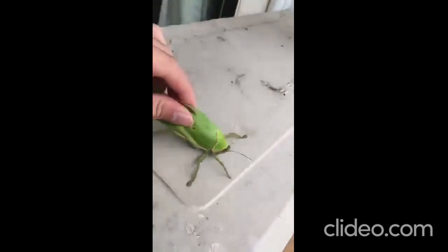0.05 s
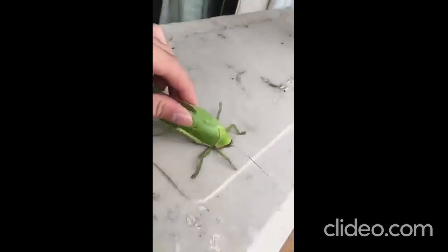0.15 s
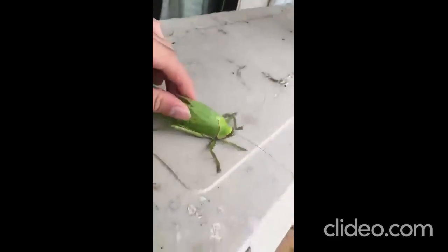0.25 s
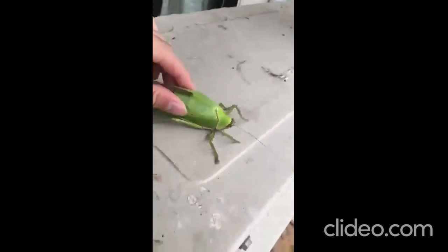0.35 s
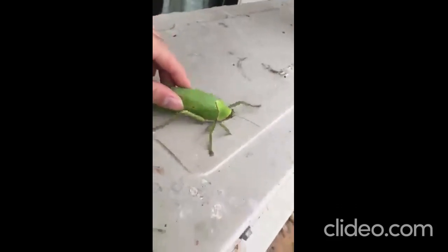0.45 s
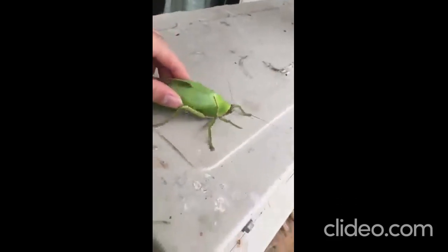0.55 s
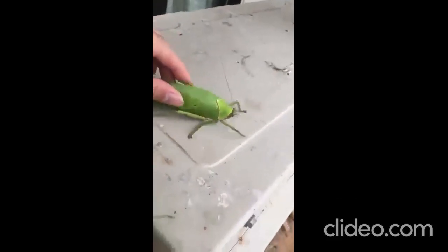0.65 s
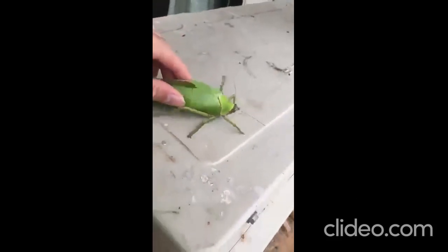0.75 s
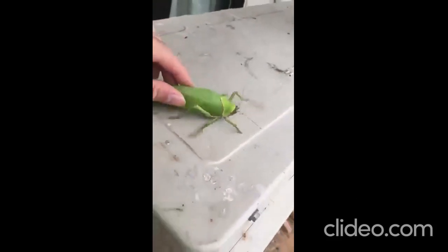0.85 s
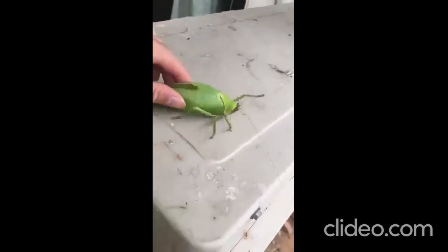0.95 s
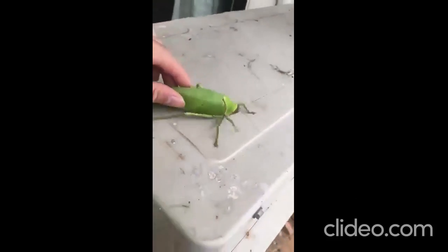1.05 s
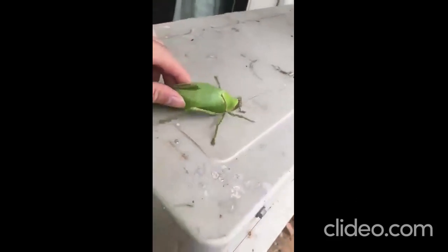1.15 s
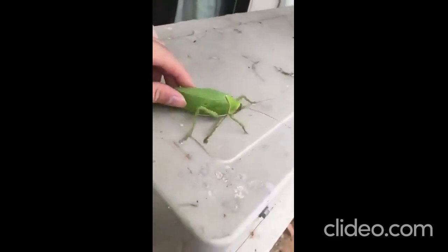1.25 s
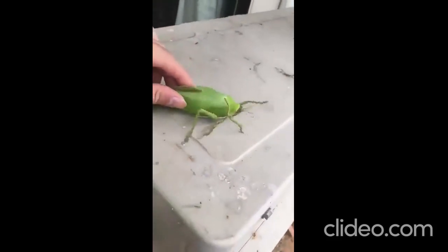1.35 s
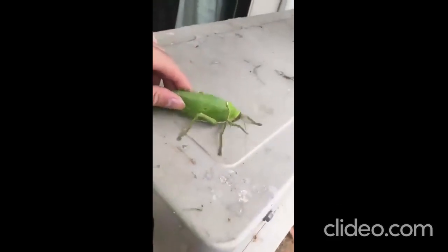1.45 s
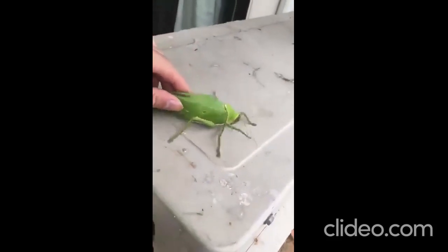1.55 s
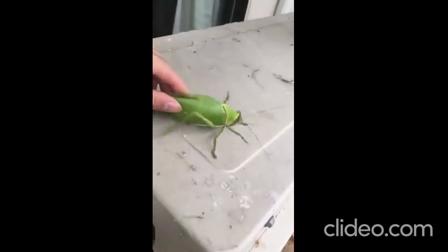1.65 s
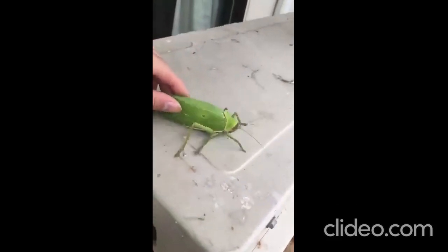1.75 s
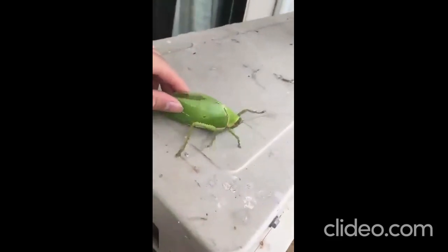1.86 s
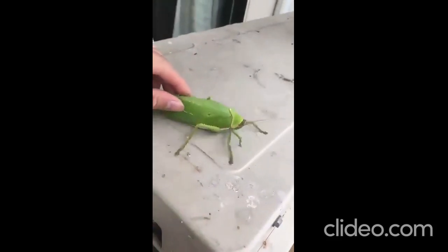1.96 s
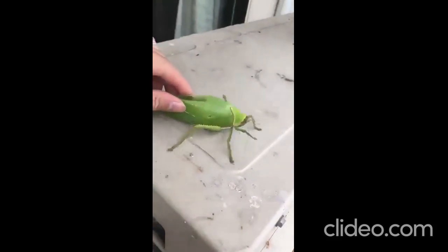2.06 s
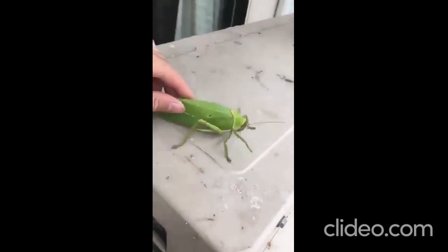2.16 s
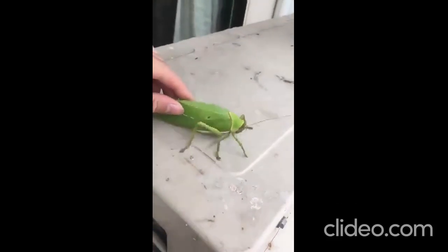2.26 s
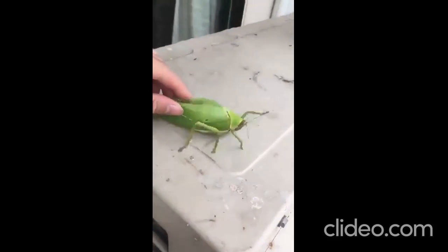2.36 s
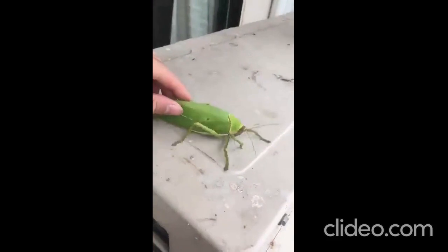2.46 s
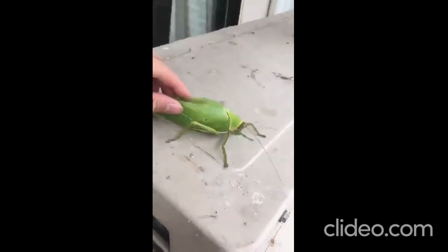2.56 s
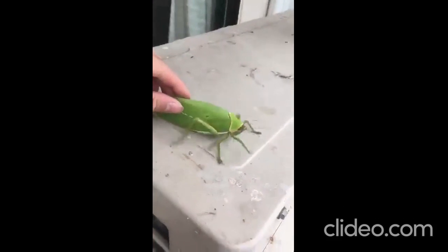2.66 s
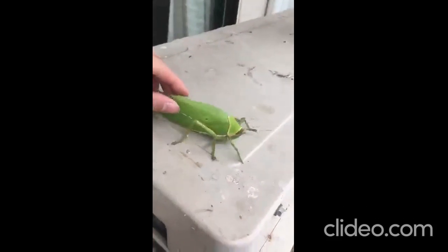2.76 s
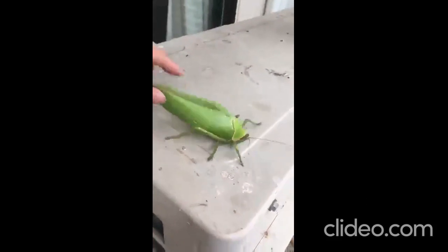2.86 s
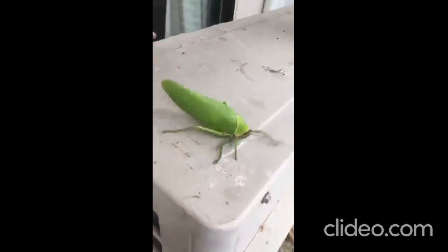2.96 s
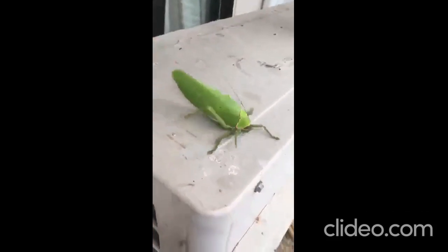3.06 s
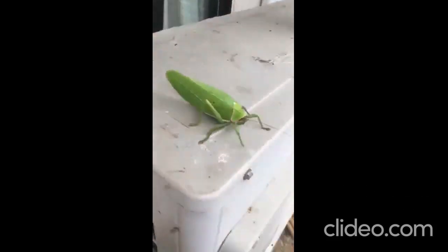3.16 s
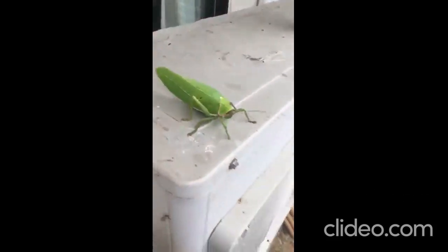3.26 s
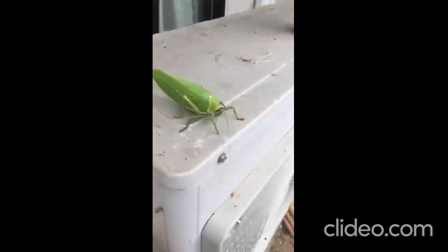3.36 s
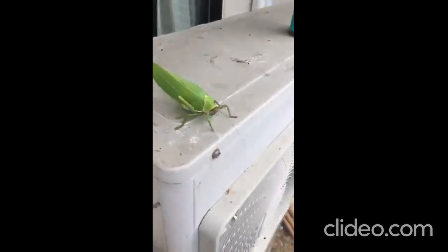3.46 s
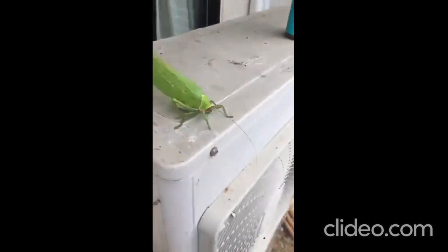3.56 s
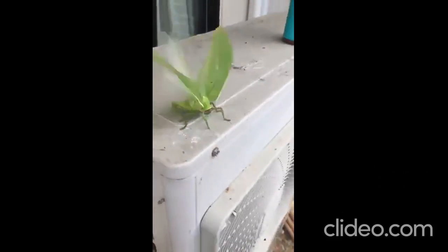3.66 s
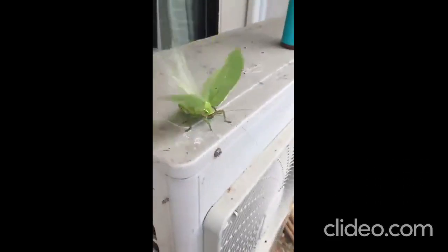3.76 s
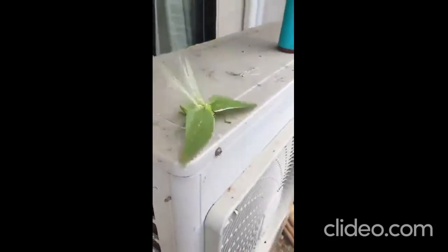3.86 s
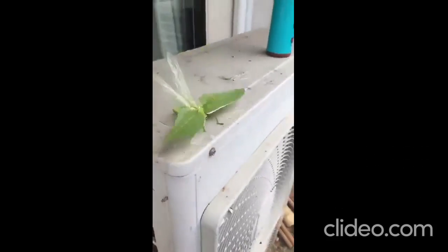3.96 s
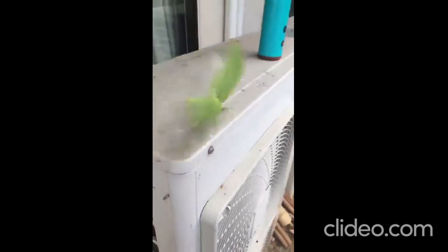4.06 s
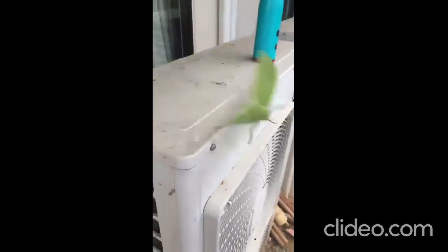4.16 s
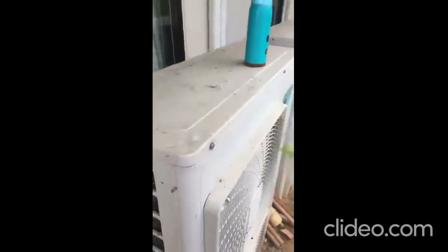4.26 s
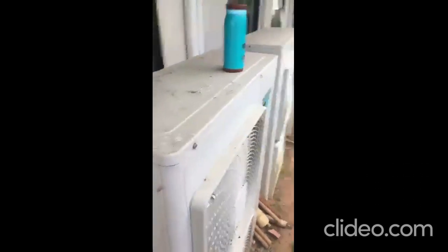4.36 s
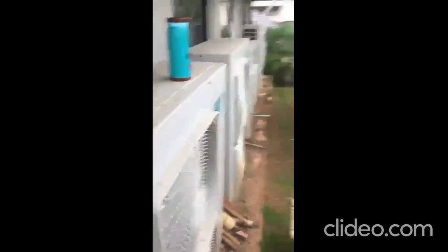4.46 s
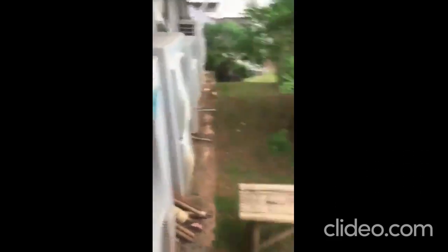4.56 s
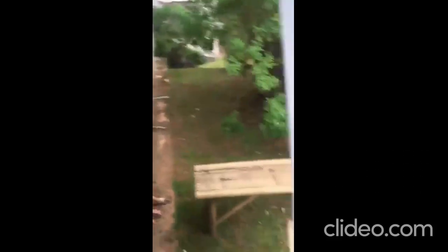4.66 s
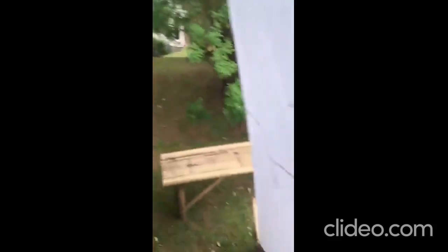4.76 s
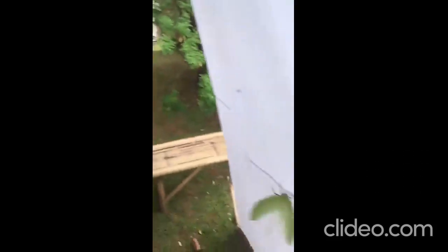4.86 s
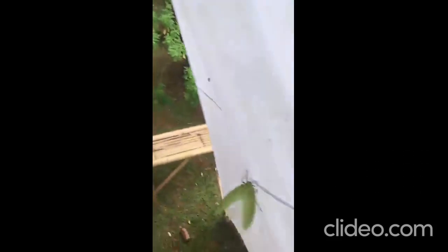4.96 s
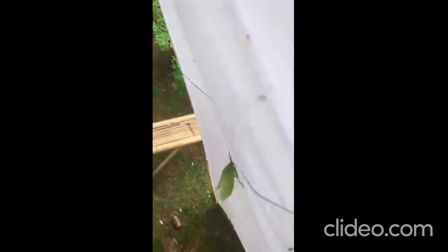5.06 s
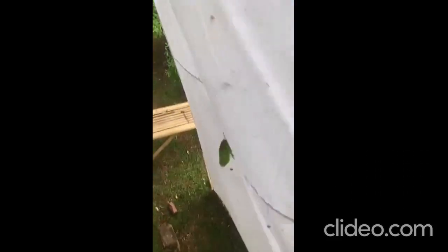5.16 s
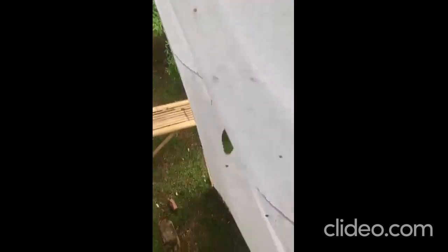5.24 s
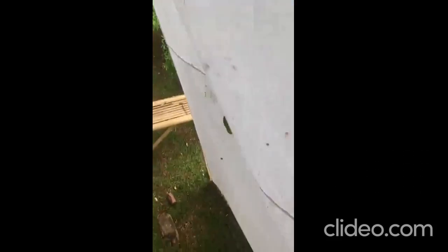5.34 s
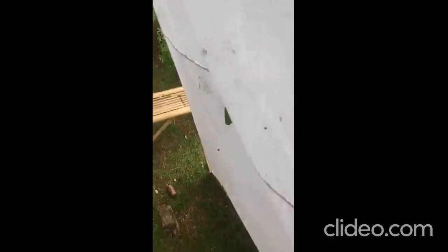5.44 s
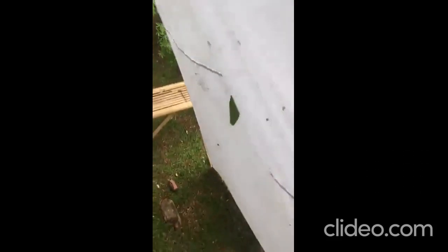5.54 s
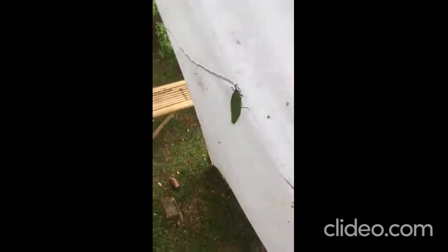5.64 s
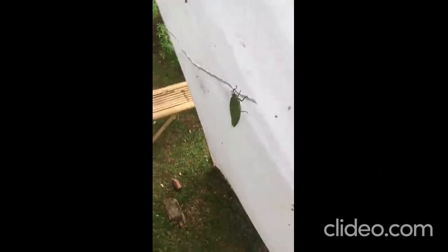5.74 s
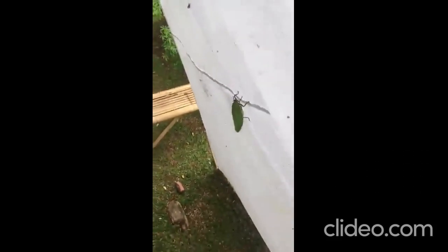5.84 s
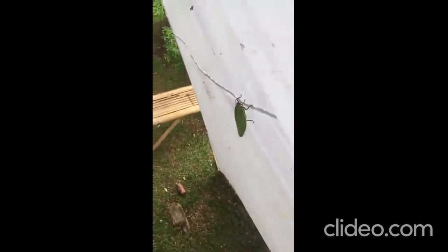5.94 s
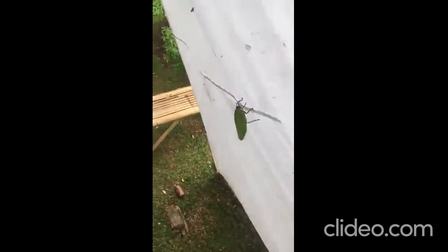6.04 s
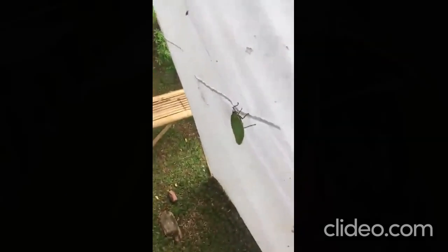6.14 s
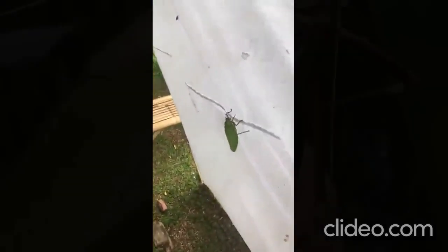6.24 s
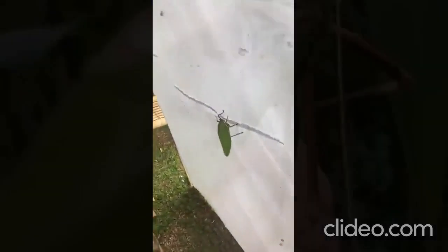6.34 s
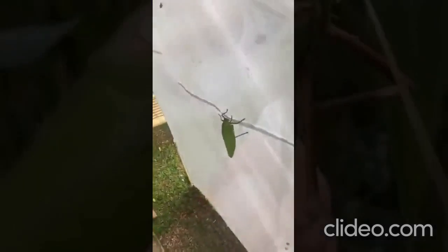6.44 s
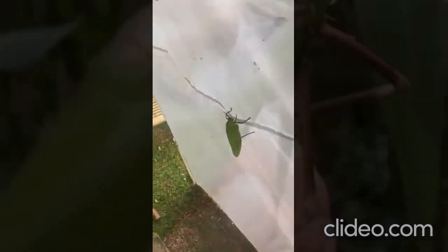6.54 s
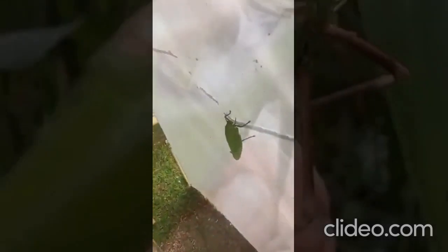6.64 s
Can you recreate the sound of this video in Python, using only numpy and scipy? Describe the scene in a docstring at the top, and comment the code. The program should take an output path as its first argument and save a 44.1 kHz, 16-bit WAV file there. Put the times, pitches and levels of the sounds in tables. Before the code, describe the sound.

Outdoors on a porch, close microphone, slight quick wall reflections. From about 0.2 s a large katydid rasps faintly as its wing opens, a quick toothy rattle, then at 0.33 s closes it with a loud, almost pure chirp near 2.3 kHz. Thirteen such chirps follow evenly, every 0.2 to 0.27 s until 3.1 s, each only 0.03 to 0.08 s long, some starting with a scratchy skid; the opening rasps soon become barely audible. Chirping stops. From 3.6 to 5.5 s come faint wing rustles, sharp little ticks near 4.4 and 4.7 s, and dull soft thuds, strongest at 4.75 s, while low rumble and airy hiss rise. Thin falling bird notes sound far away around 3.3, 4.3 to 4.7 and 5.9 to 6.4 s. From 6.05 s a harsher, raspy insect song stutters in triple bursts, ten a second, swelling to the end.

```python
"""A large katydid, held by the wings on a porch close to the microphone, protests: each wing opening rasps
faintly as a scraper rattles over a file of teeth, each closing gives a loud, almost pure chirp near 2.3 kHz,
one tooth per cycle. Let go, it flutters off and lands on a hanging sheet, with ticks and rustles of random grains.
At the end a harsher insect song of rough notes and rasp swells in triple bursts.
Small birds, thin falling tones, call far away over the garden's low rumble, air and hiss of coloured noise."""
import sys
import numpy as np
from scipy import signal
from scipy.fft import rfft, irfft, next_fast_len
from scipy.io import wavfile

SR = 44100
rng = np.random.default_rng(int(sys.argv[2]) if len(sys.argv) > 2 else 0)


def wrap_up_sound(samples):
    """Save the sound to the file named by the first command line argument, as 16-bit audio."""
    columns = np.atleast_2d(samples).T
    # keep every value between -1 and 1, then stretch to whole-number steps
    tamed = np.clip(columns, -1, 1)
    steps = np.round(tamed * 32767).astype(np.int16)
    wavfile.write(sys.argv[1], SR, steps)


N = 295470
TIME = np.arange(N) / SR


def from_db(db):
    """Decibels to gain."""
    return 10 ** (np.asarray(db) / 20)


def rms_one(x):
    """Scale to unit rms."""
    return x / np.sqrt(np.mean(x ** 2) + 1e-20)


def at_hz(points, hz):
    """Read a spectrum in dB on a log-frequency axis."""
    point_hz, db = np.transpose(points)
    return np.interp(np.log(hz + 1e-9), np.log(point_hz), db)


def colour(x, spectrum):
    """Causal (minimum-phase) filter with the given spectrum."""
    size = 2 * next_fast_len(len(x))
    gain = from_db(at_hz(spectrum, np.fft.rfftfreq(size, 1 / SR)))
    # folding the cepstrum forward in time gives minimum phase
    cepstrum = irfft(np.log(gain))
    cepstrum[1:size // 2] *= 2
    cepstrum[size // 2 + 1:] = 0
    return irfft(rfft(x, size) * np.exp(rfft(cepstrum)))[:len(x)]


def noise(spectrum):
    """Coloured noise, rms 1."""
    return rms_one(colour(rng.standard_normal(N), spectrum))


def grains(spectrum, per_s, spread_db):
    """Random clicks of uneven size and either sign, coloured by a spectrum, rms 1."""
    sizes = from_db(spread_db * rng.standard_normal(N).clip(-2, 2)) * rng.choice([-1, 1], N)
    struck = rng.random(N) < per_s / SR
    return rms_one(colour(sizes * struck, spectrum))


def wobble(t, rate):
    """Random values of spread 1, drawn rate times a second and joined by straight lines."""
    return np.interp((t - t[0]) * rate, np.arange(len(t)), rng.standard_normal(len(t)))


def span(start, stop):
    """Samples and times of an event, with a margin for its edges."""
    where = slice(int((start - .01) * SR), int((stop + .02) * SR))
    return where, TIME[where]


def gate(t, start, stop, rise, fall):
    """Opens after start and has closed by stop, with rounded edges."""
    opening = np.sin(np.pi / 2 * np.clip((t - start) / rise, 0, 1))
    closing = np.sin(np.pi / 2 * np.clip((stop - t) / fall, 0, 1))
    return opening * closing


def arc(u, first, middle, last):
    """Parabola through three values as u goes from 0 to 1, held outside."""
    return np.polyval(np.polyfit([0, .5, 1], [first, middle, last], 2), np.clip(u, 0, 1))


def in_time(rows):
    """The columns of a curve, sample by sample."""
    s, *columns = np.transpose(rows)
    return [np.interp(TIME, s, c) for c in columns]


def pressed(pressure, light, firm):
    """A value between those of a light and a firm stroke."""
    return light + pressure * (firm - light)


# Closing strokes. Each row: start in seconds, grip in seconds, stop in seconds, pitch in Hz,
# mid-stroke level in dB, rise from the grip to mid-stroke in dB, level just before the grip in dB, pressure 0-1.
CLOSING_STROKES = [(.333, .3345, .368, 2260, -4.3, 1.5, -10, 1), (.554, .555, .603, 2300, -3.5, 0, -10, .7),
                   (.752, .771, .821, 2400, -4, 6, -17, .05), (.939, .958, 1.015, 2345, -6, 5, -20, .05),
                   (1.162, 1.188, 1.226, 2380, -5, 3, -16, .4),
                   (1.38, 1.394, 1.427, 2295, -8, 11, -20, .75),
                   (1.592, 1.616, 1.635, 2230, -5.5, 6, -35, .85),
                   (1.809, 1.828, 1.877, 2435, -6.5, -2, -10, .55),
                   (2.053, 2.075, 2.126, 2375, -5.3, 0, -14, .1),
                   (2.288, 2.314, 2.336, 2230, -5.6, 5, -15, .8),
                   (2.543, 2.557, 2.59, 2170, -5.3, 9, -33, .8), (2.775, 2.789, 2.82, 2260, -4, 7, -16, .9),
                   (3.061, 3.073, 3.135, 2315, -5.2, 0, -12, .25)]
# Overtones of the chirp. Each row: frequency in Hz, relative level in dB.
OVERTONE_SPECTRUM = [(3500, 4), (4600, 1.5), (7000, -12), (8000, -15), (9300, -8.5), (11600, -5),
                     (14000, -5)]
# Scraper on the teeth. Each row: frequency in Hz, relative density in dB per Hz.
SCRAPE_SPECTRUM = [(300, -17.5), (1000, -4), (2000, 4.5), (3000, 4.5), (4200, 3.5), (6300, 0.5),
                   (7900, -17), (9500, -12.5), (13000, -2)]


def closings(slack=0.12, rattle=0.12, loose_jitter=.022, firm_jitter=0.0075, friction_db=-12, build_db=17):
    """The scraper skids, grips, then strikes one tooth per cycle of the wing's resonance: a near sine."""
    tone, overtones, scrape = np.zeros((3, N))
    edge = .004  # s
    for start, grip, stop, pitch, db, swell_db, lead, pressure in CLOSING_STROKES:
        where, t = span(start, stop)
        held = stop - edge - grip
        u = np.clip((t - grip) / held, 0, 1)
        loose = np.interp(t, [grip - edge, grip + edge], [1, 0])

        # the wing is still gathering speed before the grip; a firm stroke then speeds up (Hz per s)
        speed = np.interp(t, [min(start, grip - edge), grip], [1 - slack, 1])
        glide = pressed(pressure, 0, 7000) * held * (u - .5)
        # fast jitter and a slower wander, as shares of the pitch
        unsteady = (firm_jitter + loose_jitter * loose) * wobble(t, 600) + .009 * wobble(t, 90)
        hz = (pitch + glide) * speed * (1 + unsteady)
        phase = 2 * np.pi * np.cumsum(hz) / SR

        # a light stroke fades after the middle, a firm one holds its level
        grip_db = db - swell_db
        level = arc(u, grip_db, db, db - pressed(pressure, 6, -1.5))
        lead_in = np.interp(t, [min(start, grip - 2 * edge), grip - edge, grip],
                            [lead - grip_db - build_db, lead - grip_db, 0])
        contact = gate(t, start, stop, .0012 + (grip - start) / 5, edge)
        shake = 1 + rattle * loose * wobble(t, 1400) + .035 * wobble(t, 250) + .02 * wobble(t, 1100)
        tone[where] += from_db(level + lead_in) * contact * shake * np.sin(phase)

        # the tooth impacts add overtones, brighter when pressed firmly
        impacts = from_db(pressed(pressure, -48.5, -37.5) + lead_in / 4) * contact
        for k in np.arange(2, 7):
            overtone_db = at_hz(OVERTONE_SPECTRUM, k * hz) + 2 * wobble(t, 140)
            overtones[where] += impacts * from_db(overtone_db) * np.sin(k * phase)

        # a skidding scraper also squeaks above the note, rising and wavering by shares of 2960 Hz
        skidding = gate(t, start, grip + edge / 2, max(grip - start, edge / 2), edge) ** 2
        rising = np.interp(t, [start, grip], [-.5, .5])
        squeak_hz = 2960 * (1 + .15 * rising + .08 * wobble(t, 900))
        squeak_phase = 2 * np.pi * np.cumsum(squeak_hz) / SR
        squeak_db = pressed(pressure, -35.5, -27) + 3 * wobble(t, 500).clip(-2, 2)
        tone[where] += from_db(squeak_db) * skidding * np.sin(squeak_phase)

        # scraping noise: friction, skid, release tick and landing click
        friction = impacts * from_db(friction_db + lead_in / 4)
        friction = friction + from_db(pressed(pressure, -47, -41)) * skidding
        release = gate(t, stop - edge, stop, .0015, .002)
        friction = friction + from_db(pressed(pressure, -53, -34)) * release
        # the landing is hardest when the scraper grips at once: it loses 1001 dB per s of skid
        landing = gate(t, start, start + edge, .0006, .002)
        friction = friction + from_db(-27.5 - 1001 * max(grip - start, 0)) * landing
        # worn teeth catch unevenly
        scrape[where] += friction * from_db(3.5 * wobble(t, 450).clip(-2, 2))
    # so small a wing radiates little bass
    tone = signal.sosfilt(signal.butter(4, 1450, "high", fs=SR, output="sos"), tone)
    return tone + overtones + scrape * noise(SCRAPE_SPECTRUM)


# Opening strokes. Each row: start in seconds, stop in seconds, top speed in teeth per second before unevenness,
# level at top speed in dB, fade from there in dB.
OPENING_STROKES = [(0.225, .312, 2360, -24.5, 11), (.434, .532, 2370, -30, 16),
                   (0.651, .735, 2850, -36, 19), (0.86, .932, 3200, -45, 13),
                   (1.079, 1.152, 3000, -42.5, 15), (1.301, 1.365, 3430, -44, 8),
                   (1.519, 1.578, 3480, -43, 11), (1.736, 1.802, 3600, -43, 5),
                   (1.989, 2.045, 3950, -45, 9), (2.22, 2.278, 3780, -49.5, 3.5),
                   (2.469, 2.525, 4000, -43.5, 12.5), (2.706, 2.765, 4000, -43, 2),
                   (2.994, 3.045, 5230, -48.5, 6.5)]
# Body of the forewing. Each row: frequency in Hz, relative level in dB.
FOREWING_SPECTRUM = [(200, -36.5), (700, -19), (1200, -8), (2000, -1.5), (2900, 10), (3800, -5.5),
                     (5000, -13.5), (6300, -13.5), (7900, -27.5), (9500, -19.5), (12500, -14.5),
                     (14000, -17)]


def openings(begin_db=-5, finish_db=-5, uneven=.033, hiss_db=-16):
    """On the way back the scraper rattles lightly over the teeth, soon at top speed, then slowing."""
    start_share = .7  # of the top speed
    free_teeth_per_s, slowing_power = 6500, 1.3
    out, envelope = np.zeros((2, N))
    for start, stop, top, turn_db, fade_db in OPENING_STROKES:
        where, t = span(start, stop)
        # a louder opening drags more: it tops out and slows sooner, and strikes the teeth less evenly
        drag = min(from_db(turn_db + 20), .9)
        turn = start + .29 * (1 - drag) * (stop - start)
        jitter = .026 + .38 * drag ** 2

        # the nearer the top speed is to free running, the less it slows
        end_share = (top / free_teeth_per_s) ** slowing_power
        early = np.clip((turn - t) / (turn - start), 0, 1)
        late = np.clip((t - turn) / (stop - turn), 0, 1)
        slowing = (1 - end_share) * late ** (1.35 * (1 - drag))
        glide = top * (1 - (1 - start_share) * early ** 2 - slowing)
        rate = glide * (1 + uneven * (wobble(t, 500) + wobble(t, 110)))

        passed = np.cumsum(rate) / SR
        teeth = np.arange(1, int(passed[-1]))
        chance = rng.standard_normal((len(t), 2))[teeth]
        at = np.interp(teeth + jitter * chance[:, 0], passed, np.arange(len(t))).clip(0, len(t) - 2)
        # each strike falls between two samples
        clicks, whole = np.zeros(len(t)), at.astype(int)
        size = from_db(2 * chance[:, 1])
        np.add.at(clicks, whole, size * (1 - at + whole))
        np.add.at(clicks, whole + 1, size * (at - whole))

        late_db = turn_db - fade_db
        level = np.interp(t, [start, turn, stop - .011, stop],
                          [turn_db + begin_db, turn_db, late_db, late_db + finish_db])
        envelope[where] = from_db(level + 2.5 * wobble(t, 200)) * gate(t, start, stop, .003, .003)
        # subtracting the mean strike rate leaves no slow push
        out[where] += envelope[where] * rms_one(colour(clicks - rate / SR, FOREWING_SPECTRUM))
    return out + from_db(hiss_db) * envelope * noise(FOREWING_SPECTRUM)


# Wings and feet brushing things. Each row: centre in seconds, length in seconds,
# crackle level in dB, body level in dB.
WING_AND_FOOT_TOUCHES = [(3.616, 0.039, -57.5, -56.5), (3.801, 0.075, -58.5, -62.5),
                         (4.175, 0.025, -60, -71), (4.235, 0.0087, -52, -55), (4.423, 0.0029, -36, -61),
                         (4.725, 0.0052, -46.5, -44.5), (4.751, 0.03, -47, -46), (4.904, 0.057, -54.5, -55),
                         (4.918, 0.006, -48, -46.5), (5.25, .057, -55.5, -75), (5.364, 0.041, -57.5, -52.5),
                         (5.48, .069, -61.5, -62.5)]
# Bright crackle of a touch. Each row: frequency in Hz, relative level in dB.
CRACKLE_SPECTRUM = [(1000, -11), (3500, -2), (6000, 2.5), (9000, 1), (14000, 4.5)]
# Fuller body of a touch. Each row: frequency in Hz, relative level in dB.
BODY_SPECTRUM = [(100, 8), (400, -5.5), (1000, -3), (2000, -6), (4000, -7.5), (9000, -74)]


def brushes():
    """Wings and feet tick and rustle against a metal casing and the sheet: random grains in short swells."""
    crackle, body = np.zeros((2, N))
    for s, length, crackle_db, body_db in WING_AND_FOOT_TOUCHES:
        where, t = span(s - length, s + 2 * length)
        swell = np.exp(-2 * np.abs(t - s) / length) * np.sqrt(2)
        crackle[where] += from_db(crackle_db) * swell
        body[where] += from_db(body_db) * swell
    crackle = crackle * grains(CRACKLE_SPECTRUM, per_s=2900, spread_db=6.5)
    return crackle + body * grains(BODY_SPECTRUM, per_s=6100, spread_db=-1.0)


# Swell of the harsh song. Each row: time in seconds, relative level in dB.
SONG_SWELL = [(6.09, -62), (6.18, -45), (6.27, -40), (6.47, -35.5), (6.68, -31)]
# The three scrapes of a burst. Each row: delay in seconds, length in seconds, relative level in dB.
BURST_SCRAPES = [(.001, 0.015, -1), (0.018, 0.019, 0.5), (0.046, .024, 0)]
# Broad rasp of the scrapes. Each row: frequency in Hz, relative density in dB per Hz.
RASP_SPECTRUM = [(80, 0), (200, 3), (600, -2), (1500, 0), (2100, -7), (2900, 6), (3700, -8), (6000, -5.5),
                 (7300, -14), (8000, -21.5), (9500, -20.5), (11000, -17.5), (13200, -15.5)]


def harsh_song(note_hz=2920, note_db=-1.0, half_pitch_db=-9, bend=0.1187, rough=0.042,
               broad_db=-3, flutter_db=3, echo_db=-11):
    """Stuttering scrapes: rasp around a rough arching note; alternate harder teeth add half its pitch."""
    song_start, burst_period = 6.054, .098  # s
    envelope, notes = np.zeros((2, N))
    loudness, = in_time(SONG_SWELL)
    scrapes = [(s + delay, s + delay + length, db)
               for s in np.arange(song_start, TIME[-1], burst_period)
               for delay, length, db in BURST_SCRAPES if s + delay < TIME[-1]]
    # no two scrapes are quite alike: level spreads by 1.2 dB, pitch by a share of .03
    chances = rng.standard_normal((len(scrapes), 2))
    for (start, stop, db), (louder, higher) in zip(scrapes, chances):
        where, t = span(start, stop)
        level = loudness[where] + db + 1.2 * louder + flutter_db * wobble(t, 300)
        stroke = from_db(level) * gate(t, start - .002, stop + .002, .003, .005)
        arch = arc((t - start) / (stop - start), 1 - bend, 1, 1 - bend / 2)
        hz = note_hz * arch * (1 + .03 * higher + rough * wobble(t, 700) + .035 * wobble(t, 70))
        phase = 2 * np.pi * np.cumsum(hz) / SR
        envelope[where] += stroke
        notes[where] += stroke * (np.sin(phase) + from_db(half_pitch_db) * np.sin(phase / 2))
    rasp = grains(RASP_SPECTRUM, per_s=18000, spread_db=5.5)
    # the scrapes die away between bursts, with a time constant of 21 ms
    keep = np.exp(-1 / (0.021 * SR))
    tail = signal.lfilter([1 - keep], [1, -keep], envelope + 1e-18)
    song = from_db(note_db) * notes + from_db(broad_db) * envelope * rasp
    return song + from_db(echo_db) * tail * noise(RASP_SPECTRUM)


def porch(x, wall_db=-23, wall_t60=0.11, tail_db=-45, tail_t60=.75):
    """Quick reflections off the nearby wall, then a faint long tail: decaying noise as echoes."""
    t, response = TIME[:SR], 0
    for db, t60 in (wall_db, wall_t60), (tail_db, tail_t60):
        echoes = rng.standard_normal(SR) * (t > .002) * from_db(-60 * t / t60)
        response = response + from_db(db) * echoes / np.linalg.norm(echoes)
    return x + signal.fftconvolve(x, response)[:N]


# Soft low bumps. Each row: time of the fullest swell in seconds, level in dB.
SOFT_BUMPS = [(3.931, -41), (4.753, -31.5), (4.819, -43), (5.545, -42), (5.856, -39.5)]


def bumps(thud_hz=62, rise=0.0089):
    """Dull thuds: an unsteady low sine that swells and dies within a few cycles."""
    out = np.zeros(N)
    for s, db in SOFT_BUMPS:
        where, t = span(s - rise, s + .12)
        age = np.maximum(t - s + rise, 0) / rise
        phase = 2 * np.pi * np.cumsum(thud_hz * (1 + 0.27 * wobble(t, 154))) / SR
        out[where] += from_db(db) * age * np.exp(1 - age) * np.sin(phase)
    return out


# Phrases of far birds. Each row: start in seconds, stop in seconds, note spacing in seconds,
# first note's level in dB.
FAR_BIRD_PHRASES = [(3.33, 3.72, .16, -70), (4.25, 4.3, .1, -60), (4.45, 4.66, .06, -59),
                    (5.86, 6.37, .095, -64)]


def birds(pitch_hz=3900, fall=.18, length=.06, ragged=.055, variety=.07):
    """Thin, ragged notes from far away, each falling along an arc from a pitch of its own."""
    swell_db_per_s = 23  # a phrase grows louder note by note
    out = np.zeros(N)
    notes = [(s, db + swell_db_per_s * (s - start))
             for start, stop, spacing, db in FAR_BIRD_PHRASES
             for s in np.arange(start, stop, spacing)]
    chances = rng.uniform(-0.78, 1, (len(notes), 2))
    for (s, db), (height, stretch) in zip(notes, chances):
        where, t = span(s, s + 2 * length)
        stop = s + length * (1 + stretch / 4)
        falling = arc((t - s) / (stop - s), 1, 1 - fall / 4, 1 - fall)
        hz = pitch_hz * (1 + variety * height) * falling
        phase = 2 * np.pi * np.cumsum(hz * (1 + ragged * wobble(t, 900))) / SR
        out[where] += from_db(db) * gate(t, s, stop, 0.0098, 0.039) * np.sin(phase)
    return out


# Garden behind the porch. Each row: time in seconds, relative rumble level in dB,
# relative level of the murmuring air in dB.
GARDEN_LEVELS = [(.2, -53, -63), (.45, -59.5, -66.5), (.9, -66.5, -78.5), (2.2, -67, -70.5),
                 (3.25, -64, -73), (3.8, -55.5, -60.5), (4.5, -52.5, -62.5), (5.2, -53, -65.5),
                 (6.1, -55.5, -66)]
# Treble hiss. Each row: time in seconds, relative level in dB.
HISS_LEVELS = [(.22, -60), (.5, -75.5), (3.3, -75.5), (3.8, -71), (4.4, -61.5), (6.1, -69.5)]
# Low rumble. Each row: frequency in Hz, relative density in dB per Hz.
RUMBLE_SPECTRUM = [(13, -37.5), (22, -23), (43, 3), (59, -3.5), (71, 4.5), (97, -9), (159, -4.5),
                   (203, -12.5), (232, -18.5), (292, -22), (400, -23), (520, -54), (880, -120)]
# Murmur of the air. Each row: frequency in Hz, relative density in dB per Hz.
MURMUR_SPECTRUM = [(150, -27), (250, 3), (474, -6), (586, -1), (944, -1.5), (1100, 1), (2360, -10),
                   (3990, -16), (5000, -25.5), (6500, -49), (11000, -120)]
# Hiss of the air. Each row: frequency in Hz, relative density in dB per Hz.
HISS_SPECTRUM = [(2000, -8), (3500, 0), (5500, -2), (8000, -5.5), (14000, -1.5)]


def garden(low_db=2.0, middle_db=1.5, high_db=.5):
    """Outdoor rumble, air and hiss as three coloured noises, fainter while the insect chirps."""
    rumble, air = in_time(GARDEN_LEVELS)
    hiss, = in_time(HISS_LEVELS)
    low = from_db(low_db + rumble) * noise(RUMBLE_SPECTRUM)
    middle = from_db(middle_db + air) * noise(MURMUR_SPECTRUM)
    high = from_db(high_db + hiss) * noise(HISS_SPECTRUM)
    return low + middle + high


def scene():
    """The insects and touches ring on the porch; bumps, birds and garden come without its echoes."""
    close = closings() + openings() + brushes() + harsh_song()
    return (porch(close) + bumps() + birds() + garden())[None]


def record(dry):
    """The top is cut steeply above 14.1 kHz."""
    return signal.sosfilt(signal.ellip(12, .1, 80, 14100, fs=SR, output="sos"), dry)


dry = scene()
out = record(dry)
wrap_up_sound(out)
```